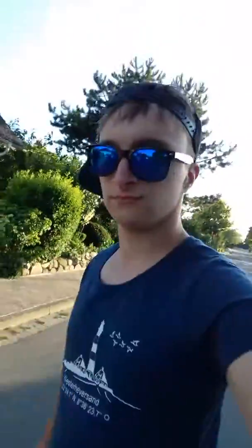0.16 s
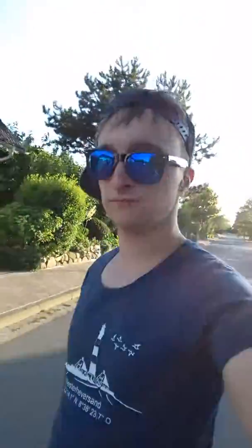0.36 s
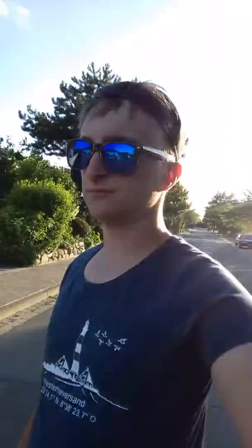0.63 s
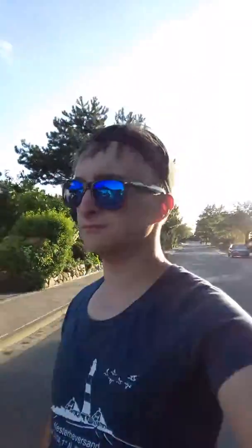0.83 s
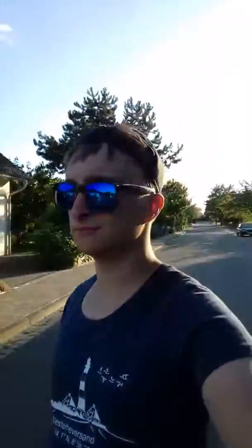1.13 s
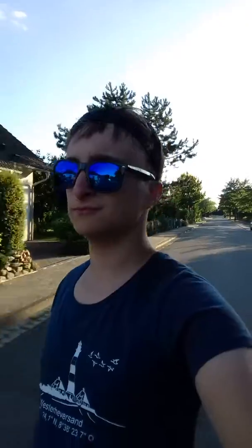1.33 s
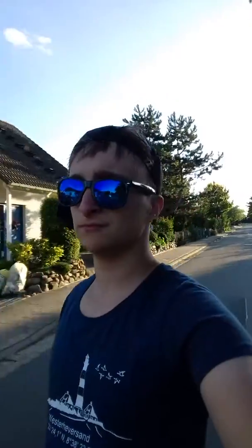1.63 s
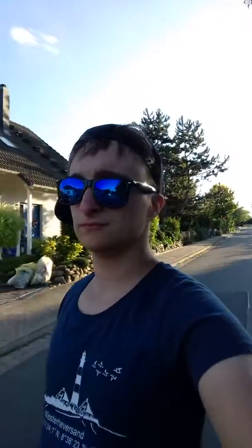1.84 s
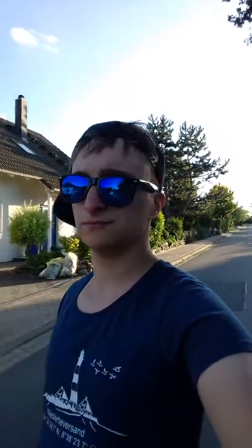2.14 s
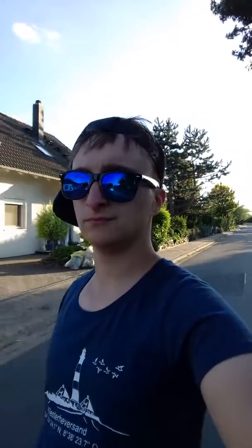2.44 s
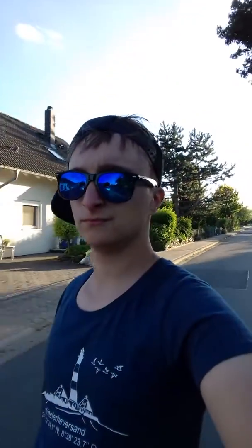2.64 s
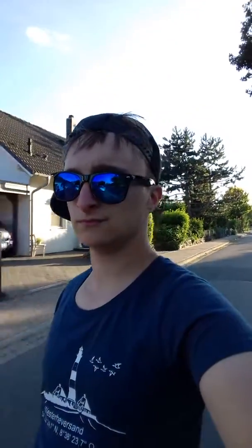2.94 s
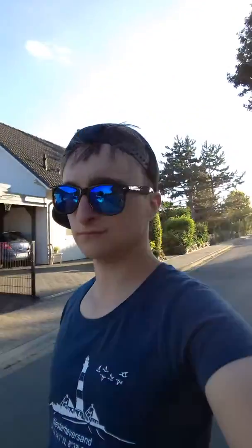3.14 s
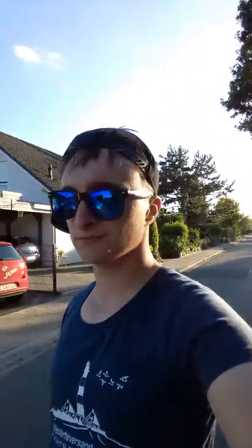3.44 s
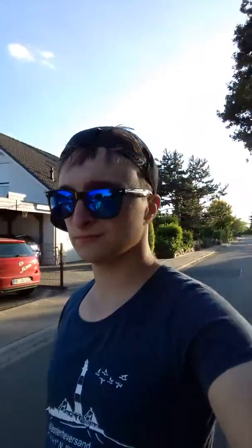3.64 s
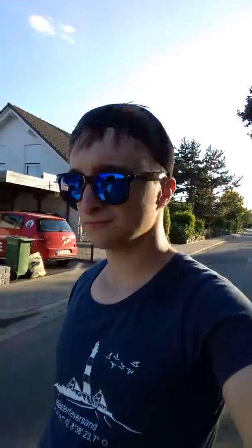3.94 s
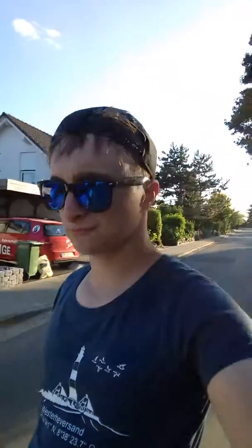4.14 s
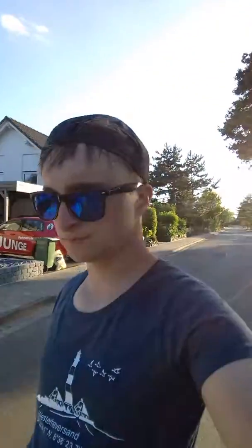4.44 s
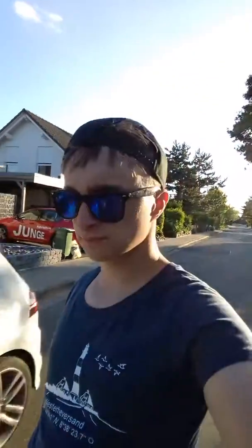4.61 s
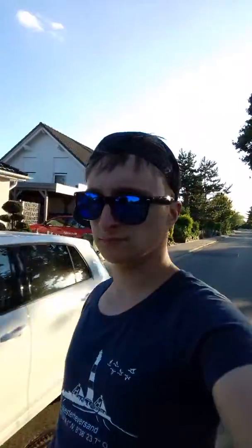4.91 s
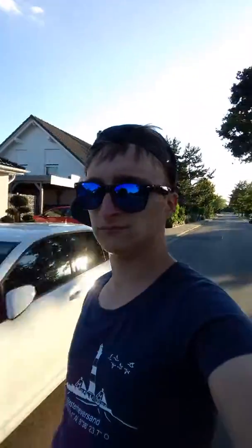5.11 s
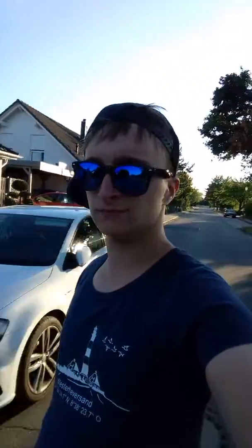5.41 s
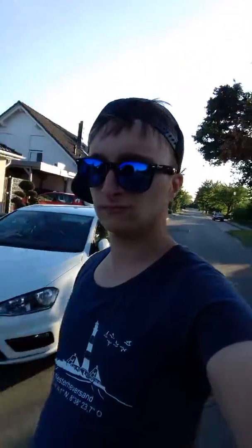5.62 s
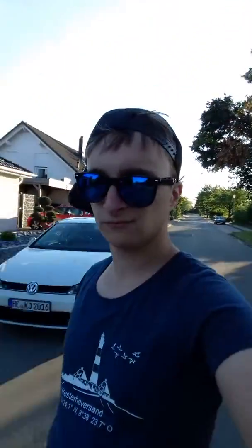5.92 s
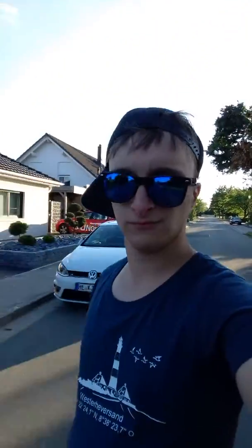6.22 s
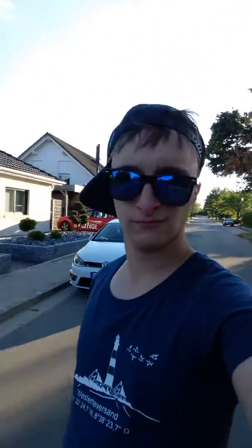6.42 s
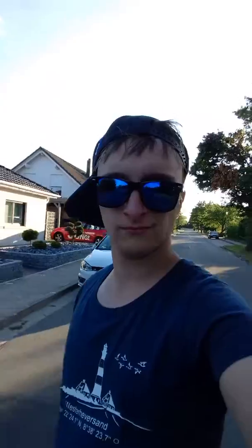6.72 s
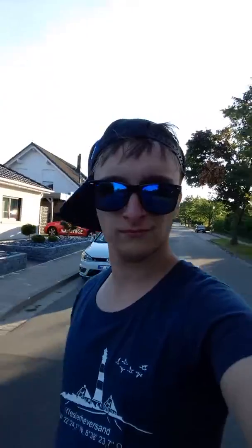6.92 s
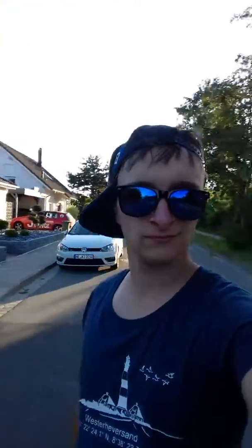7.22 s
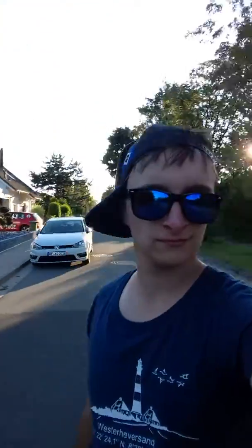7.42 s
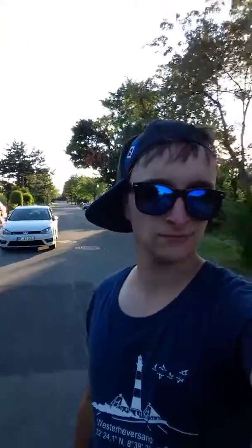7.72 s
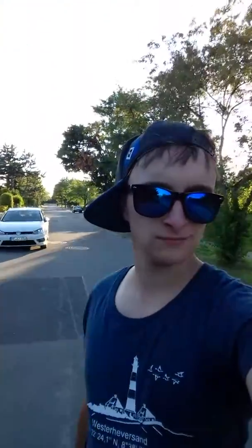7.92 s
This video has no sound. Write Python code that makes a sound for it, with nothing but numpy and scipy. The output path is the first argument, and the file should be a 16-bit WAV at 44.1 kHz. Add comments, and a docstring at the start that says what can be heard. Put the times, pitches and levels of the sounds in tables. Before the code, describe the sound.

A longboard rolls continuously over asphalt outdoors, picked up in mono by a hand-held phone above it. A brief low wind thump opens the take. From 0 to 1.1 seconds the road is coarse: the hollow wooden hum, centred around 550 hertz, is strongest, with grainy tread hiss, chattering axle hardware, tiny stone ticks and several soft knocks, ending in a firmer thump near 1.1. From 1.4 to 4.8 it runs smoother and quieter, with one dull knock at 2.4, sparse ticks around 3 and 4.7, and a low wind buffet swelling near 3.5 to 4.5. At 4.9 to 5.3 come clustered hard wooden clacks with quick rebounds, loudest at 4.93 and 5.13, plus renewed rattle. Afterwards the hum eases, with light bumps at 5.5, 6.2, 6.7 and 7.1 and a slight rough patch near 6.8, then fades slightly into smooth rolling until about 8 seconds.

```python
"""A longboard rolls over asphalt: road grain drives noise through deck resonances, giving a hollow hum.
Filtered noise hisses as the tread, and stone-like bursts of noise chatter as axle hardware on rough patches.
Seams knock the wheels, which rebound once: impulses and decaying noise ring the modes of deck and axles.
Behind it, low-passed riding wind rumbles and buffets the microphone of a hand-held phone above the board,
which adds its own white hiss."""
import sys
import numpy as np
from scipy import signal
from scipy.fft import rfft, irfft, next_fast_len
from scipy.io import wavfile
from scipy.ndimage import map_coordinates

SR = 44100
rng = np.random.default_rng(int(sys.argv[2]) if len(sys.argv) > 2 else 0)


def wav_record(signal):
    """Record a signal, one row per channel, as 16-bit PCM in the file named by sys.argv[1]."""
    frames = np.transpose(np.atleast_2d(signal))
    bounded = np.clip(frames, -1, 1)
    # unit amplitude maps onto the largest positive 16-bit level
    quanta = np.round(bounded * 32767).astype(np.int16)
    wavfile.write(sys.argv[1], SR, quanta)


def invert_db(x):
    """Field ratio 10**(x/20) for x, a level in decibels (scalar or array-like)."""
    u = np.asarray(x, float) / 20
    return 10 ** u


N = 355436  # samples


def unit(x):
    """Normalisation: the signal is scaled to rms 1."""
    return x / np.sqrt(np.mean(x ** 2) + 1e-20)


def noise():
    """White noise: equal mean power at all frequencies."""
    return rng.standard_normal(N)


def curves(rows):
    """Linear interpolation: one value per sample for each column after the time."""
    times, *columns = np.transpose(rows)
    return [np.interp(np.arange(N) / SR, times, column) for column in columns]


def wobble(rate):
    """Slow random modulation: a smooth curve through `rate` random knots a second."""
    knots = rng.standard_normal(int(N * rate / SR) + 4)
    return map_coordinates(knots, [np.arange(N) * rate / SR])


def filtered(x, response):
    """Linear filtering: the spectrum is multiplied by a complex response of frequency."""
    size = next_fast_len(N + SR // 2)
    return irfft(rfft(x, size) * response(np.fft.rfftfreq(size, 1 / SR)), size)[..., :N]


def coloured(x, points):
    """Spectral shaping: (f/Hz, level/dB) points on a log frequency axis, -120 dB beyond the ends."""
    hz, db = np.transpose(points)

    def response(f):
        return invert_db(np.interp(np.log(f + 1), np.log(hz + 1), db, left=-120, right=-120))
    return filtered(x, response)


def ringing(x, modes):
    """Modal superposition: a sum of causal damped resonances with alternating signs."""
    def response(f):
        total = 0
        for k, (centre, width, db) in enumerate(modes):
            resonance = 1j * f * width / (centre * centre - f * f + 1j * f * width)
            total = total + (-1) ** k * invert_db(db) * resonance
        return total
    return filtered(x, response)


def softened(x, corner_hz, tilt):
    """Contact compliance: urethane wheels pass little above the corner; tilt favours the upper part."""
    return filtered(x, lambda f: (f / corner_hz) ** tilt / (1 + (f / corner_hz) ** 6))


def driven(body, envelope, corner_hz, tilt=0):
    """Forced response: enveloped noise drives a body, scaled by its response to steady noise."""
    response = body(envelope * noise(), corner_hz, tilt)
    return response / np.std(body(noise(), corner_hz, tilt))


def bursts(times, db, lengths, rise):
    """Exponential decay: each blow rises quickly and falls 60 dB per length; blows add in power."""
    t = np.arange(SR // 5) / SR
    shape = invert_db(db[:, None] - 60 * t / lengths[:, None]) * (1 - np.exp(-t / rise))
    at = (times * SR).astype(int)[:, None] + np.arange(len(t))
    return np.sqrt(np.bincount(at.ravel(), shape.ravel() ** 2, N + SR)[:N])


def blows(times, db, length, rise):
    """Common damping: all blows share one decay length."""
    return bursts(times, db, np.full(len(times), length), rise)


def stones(count, scatter_db, length):
    """Random impacts: small stones at uniform times, with exponentially scattered levels in dB."""
    draw = rng.random((count, 3))
    db = -scatter_db * np.log(1 - draw[:, 1])  # a few stones are several dB larger
    return bursts(draw[:, 0] * N / SR, db, length * (.5 + draw[:, 2]), rise=0.000047)


# Deck resonances: f/Hz, width/Hz, level/dB
DECK_MODES = [(245, 253, -15.5), (468, 102, -3.5), (551.5, 35.9, 8.5), (740, 82, -9)]


def deck(force, corner_hz, tilt):
    """Resonance of a plate: softened wheel force excites the modes of the wooden deck."""
    return ringing(softened(force, corner_hz, tilt), DECK_MODES)


# Drive by the asphalt, both higher where it is coarse:
# t/s, relative deck shaking level/dB, relative hardware rattle level/dB
ROAD = [(0.0, -30.5, -63.5), (0.22, -27.5, -60), (0.45, -26.5, -55.5), (0.74, -27.5, -58.5),
        (1.1, -29, -64), (1.39, -33, -68.5), (2.15, -32, -69.5), (2.36, -31.5, -67), (3.75, -33.5, -70.5),
        (5.18, -30, -58.5), (5.3, -28, -58.5), (5.48, -35, -65.5), (5.77, -31.5, -67), (6.31, -33.5, -67.5),
        (6.8, -30, -59.5), (7.16, -33, -69), (8.06, -35.5, -70)]
SMOOTH_DB = -68  # rattle column on smooth asphalt


def rolling_hum(grain, gravel):
    """Forced vibration: road grain hums in the deck, while coarse grit raps its upper modes."""
    deck_db, rattle_db = curves(ROAD)
    shaking = invert_db(deck_db + 1.5 + 1.0 * grain) * unit(1 + 0.37 * gravel)
    hum = driven(deck, shaking, corner_hz=920)
    return hum + driven(deck, invert_db(rattle_db + 25) * gravel, corner_hz=900, tilt=4)


# Seams and bumps under the wheels:
# t/s, relative deck thump level/dB, relative wooden clack level/dB, rebound level over the first blow/dB
KNOCKS = [(.362, -16.5, -30, -3), (.444, -15.5, -38, -8), (.492, -25, -34, -3), (.569, -14, -34, -4),
          (.8666, -14.5, -39, -6), (1.0844, -9, -27, -33), (2.4, -15, -38, -8), (4.9088, -13, -24, -14),
          (4.930, -4, -14.5, 4), (5.0647, -11, -25.5, 0), (5.0985, -9, -26, -5.5),
          (5.127, -5.5, -16.5, 3.5), (5.262, -19.5, -48, -3), (5.290, -12, -26, 1), (5.330, -22, -36, -5),
          (5.474, -20.5, -39, -12), (6.191, -19, -42, -11), (6.701, -20.5, -32.5, 2.5),
          (6.788, -25, -33.5, 1.5), (7.062, -20, -42, -4)]
REBOUND_S = .0165  # from a blow until the wheel lands again
REBOUND_THUMP_DB, REBOUND_THUMP_FOLLOWS = -5.5, .45  # offset, dB of thump per dB of rebound


def landings():
    """Rebound: each blow is followed 16.5 ms later by one more landing."""
    first, thump_db, clack_db, rebound_db = np.transpose(KNOCKS)
    times = np.r_[first, first + REBOUND_S]  # the arrays list the first blows, then their rebounds
    again_db = thump_db + REBOUND_THUMP_FOLLOWS * rebound_db + REBOUND_THUMP_DB
    return times, np.r_[thump_db, again_db], np.r_[clack_db, clack_db + rebound_db]


DECK_LAG = .005  # s from wheel contact to the sharp answer of the deck
THUMP_S, THUD_S = 0.097, 0.11  # times to die by 60 dB


def knock_thump():
    """Impulse response: the wheel scrubs over the edge, and a jolt 5 ms after contact rings the deck."""
    times, thump_db, _ = landings()
    jolts = np.bincount(((times + DECK_LAG) * SR).astype(int), invert_db(thump_db), N)
    # short blows reach the upper modes; scaled by the peak of one ring
    peak = np.abs(deck(np.arange(N) == N // 2, corner_hz=900, tilt=4)).max()
    ring = invert_db(-3.5) * deck(jolts, corner_hz=900, tilt=4) / peak
    scrub = blows(times, thump_db - 4.0, THUMP_S, rise=0.0037)
    return ring + driven(deck, scrub, corner_hz=900, tilt=2.1)


def knock_thud():
    """Low-frequency forcing: the slow part of a blow is heard through the deck and directly."""
    times, thump_db, _ = landings()
    push = blows(times, thump_db - 16.5, THUD_S, rise=0.0022)
    direct = blows(times, thump_db - 18.5, THUD_S, rise=0.0039)
    return driven(deck, push, corner_hz=356) + driven(softened, direct, corner_hz=307, tilt=2.3)


# Higher resonances of deck and axles, rung by hard blows: f/Hz, width/Hz, level/dB
UPPER_MODES = [(1010, 170, -1.5), (1524, 147, 0), (2097, 330, 2.5), (2077, 300, -3.5), (2580, 200, -7),
               (3340, 710, -5.5), (4300, 470, 0)]


def upper_body(force, corner_hz, tilt):
    """Resonance at high frequency: hard contacts excite upper modes of deck and axles."""
    return ringing(softened(force, corner_hz, tilt), UPPER_MODES)


CLACK_S = 0.092  # time to die by 60 dB
TICK_CLACK_DB = -6  # the deck's share of a stone's tick
GRIT_DB, GRIT_GROWS = -60.5, 1.46  # level on smooth asphalt, dB per dB of rattle


def clack(gravel):
    """Repeated impact: uneven runs of contacts ring the upper modes in clumps, as does coarse grit."""
    times, _, clack_db = landings()
    flick, flick_db = np.transpose(TICKS)
    count = len(times) // 2  # number of first blows, and of rebounds
    hard = np.r_[times[:count], flick]
    hard_db = np.r_[clack_db[:count], flick_db + TICK_CLACK_DB]
    contacts = unit(invert_db(3.26 * wobble(260)))
    rapped = blows(hard, hard_db, CLACK_S, rise=0.0029) * contacts
    slapped = blows(times[count:], clack_db[count:], CLACK_S, rise=0.0057) * contacts
    rattle_db = curves(ROAD)[1]
    grit = invert_db(GRIT_DB + GRIT_GROWS * (rattle_db - SMOOTH_DB)) * unit(.6 + gravel)
    sound = driven(upper_body, rapped, corner_hz=5270)
    sound = sound + driven(upper_body, slapped, corner_hz=3500)  # the rebound lands duller
    return sound + driven(upper_body, grit, corner_hz=3500)


# Single stones that flick the hardware: t/s, relative tick level/dB
TICKS = [(.176, -36), (.19, -36.5), (.254, -37), (0.323, -37), (0.39, -31.5), (.535, -34), (.787, -41),
         (.81, -37), (.836, -35), (.936, -38), (2.9545, -37.5), (3.08, -42.5), (3.158, -41), (4.613, -41),
         (4.681, -32), (4.764, -30), (4.986, -36), (5.352, -29), (5.783, -32.5), (5.91, -45), (6.419, -37),
         (6.462, -37), (6.597, -33), (6.661, -33.5), (6.886, -38), (6.914, -37), (6.967, -38)]
# Spectrum of the loose hardware: f/Hz, relative level/dB
RATTLE = [(700, -26), (1500, -0.5), (2500, -7), (4300, 2), (5100, -4.5), (5900, -3.5), (7000, -9.5),
          (7600, -4.5), (8200, -16), (10500, -26.5), (11800, -21), (13000, -26), (15750, -29.5)]
TICK_DB, TICK_FOLLOWS = -19.5, 0.38  # metal tick of a knock: offset, dB per dB of clack
TICK_S, FLICK_S = 0.057, .032  # times to die by 60 dB: knock, stone


def hardware_rattle(grain, gravel):
    """Impact noise: washers and bearings chatter on stones, louder on rough patches, and tick at knocks."""
    rattle_db = curves(ROAD)[1]
    times, _, clack_db = landings()
    flick, flick_db = np.transpose(TICKS)
    chatter = invert_db(rattle_db + 9.5 + 1.4 * grain) * gravel
    chatter = chatter + blows(flick, flick_db, FLICK_S, rise=0.0019)
    shaken = blows(times, TICK_DB + TICK_FOLLOWS * clack_db, TICK_S, rise=0.0041)
    sound = shaken * unit(coloured(noise(), RATTLE))
    return sound + chatter * unit(coloured(noise(), RATTLE))


# Spectrum of the hiss under the wheels: f/Hz, relative level/dB
TREAD = [(700, -6), (850, -1), (1050, 1), (1300, -8.5), (1530, -6.5), (1750, -9), (2500, -12), (3500, -7.5),
         (4380, -1), (5150, -15.5), (5900, -17), (7000, -27.5), (8500, -37), (10500, -41)]
TREAD_DB, TREAD_FOLLOWS = -44.5, 0.33  # level on smooth asphalt, dB of hiss per dB of rattle


def tread_hiss(grain, gravel):
    """Broadband friction noise: shaped noise under the wheels grows with the roughness of the road."""
    rattle_db = curves(ROAD)[1]
    tread_db = TREAD_DB + TREAD_FOLLOWS * (rattle_db - SMOOTH_DB)
    hiss = unit(coloured(noise() * (1 + 0.25 * gravel), TREAD))
    return invert_db(tread_db + 0.54 * grain + 0.75 * wobble(27)) * hiss


def board():
    """Common excitation: the same asphalt texture and stones drive deck, tread and hardware."""
    grain = wobble(9)
    gravel = unit(stones(count=2600, scatter_db=1.0, length=0.024))
    wood = rolling_hum(grain, gravel) + knock_thump() + knock_thud() + clack(gravel)
    return wood + hardware_rattle(grain, gravel) + tread_hiss(grain, gravel)


# Deep buffet of the wind: t/s, level/dB
WIND = [(0, -31), (.09, -62), (.9, -60.5), (1.6, -62.5), (1.75, -53), (2.6, -50.5), (3.5, -45.5),
        (4.5, -47), (5.5, -51.5), (7.4, -51.5), (7.7, -57), (8.06, -53)]
# Spectra of the rumble and of the deep buffet: f/Hz, relative level/dB
RUMBLE = [(35, -45.5), (60, -11.5), (178, 0.5), (221, 1), (400, -9.5), (520, -32), (880, -120)]
BUFFET = [(15, -31), (35, -15), (60, -6.5), (100, -0.5), (160, -12), (300, -52.5)]
# mean level, dB per dB of buffet, dB per dB of deck shaking
RUMBLE_DB, RUMBLE_WIND, RUMBLE_DECK = -45, 0.33, 0.81


def wind():
    """Turbulent pressure: air buffets the microphone port; a rumble follows both wind and road."""
    buffet_db, = curves(WIND)
    deck_db = curves(ROAD)[0]
    rumble_db = RUMBLE_DB + RUMBLE_WIND * (buffet_db - buffet_db.mean())
    rumble_db = rumble_db + RUMBLE_DECK * (deck_db - deck_db.mean())
    lumps_db = 1.2 * wobble(6)  # shared unevenness
    rumble = invert_db(rumble_db + lumps_db) * unit(coloured(noise(), RUMBLE))
    return rumble + invert_db(buffet_db + lumps_db) * unit(coloured(noise(), BUFFET))


def scene():
    """Superposition: the pressures of board and wind add in one channel."""
    return (board() + wind())[None]


# Microphone notches: f/Hz, width/Hz, depth (0-1)
NOTCHES = [(10050, 380, .7), (15000, 260, .7)]
HISS_DB, TOP_HZ = -70, 15760  # rms of the white hiss before filtering, band limit


def microphone(dry):
    """Transducer response: self-noise is added, then two treble notches and a band limit apply."""
    x = dry + invert_db(HISS_DB) * rng.standard_normal(dry.shape)

    def response(f):
        notches = [1 - depth * np.exp(-((f - hz) / width) ** 2) for hz, width, depth in NOTCHES]
        return np.prod(notches, axis=0) * (f < TOP_HZ)
    return filtered(x, response)


def band_limit(x):
    """A steep low-pass at the top of the band."""
    return signal.sosfilt(signal.butter(12, 15940, fs=SR, output="sos"), x)


def record(dry):
    """Signal chain: the microphone picks up the scene and gives the finished mix."""
    mix = microphone(dry)
    return band_limit(mix)


dry = scene()
out = record(dry)
wav_record(out)
```